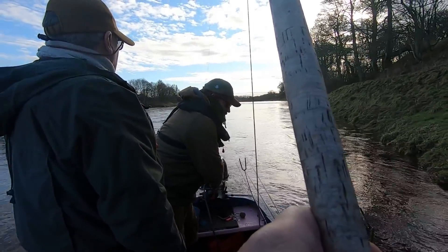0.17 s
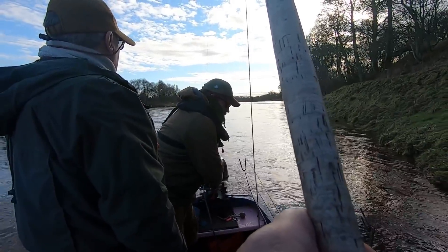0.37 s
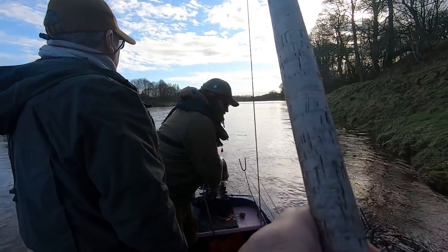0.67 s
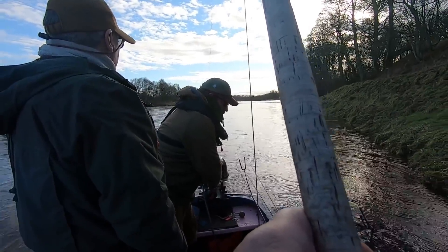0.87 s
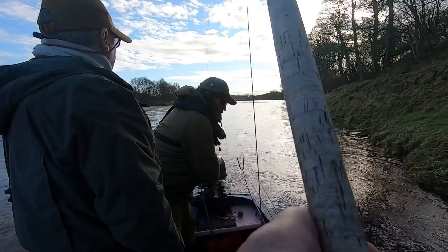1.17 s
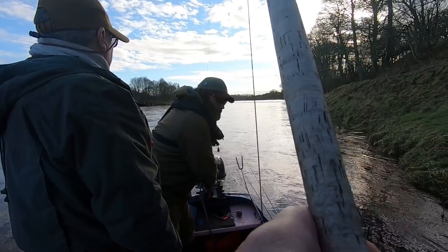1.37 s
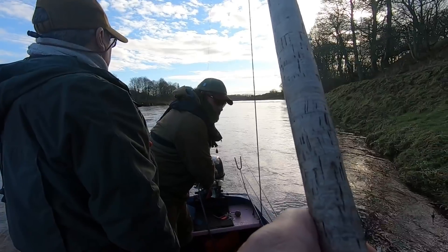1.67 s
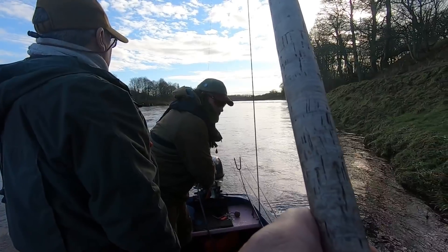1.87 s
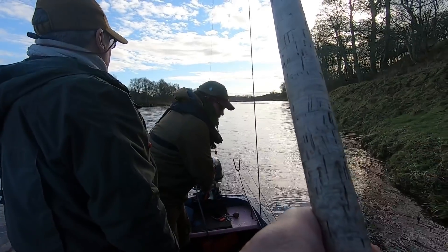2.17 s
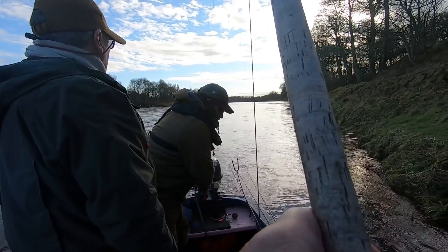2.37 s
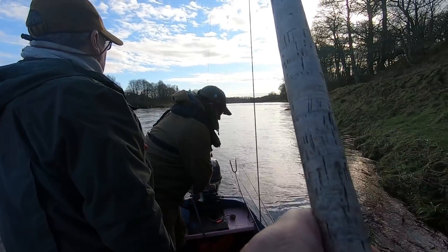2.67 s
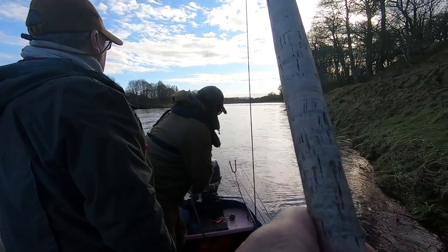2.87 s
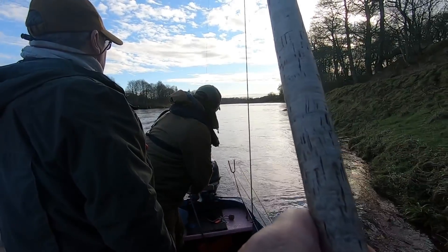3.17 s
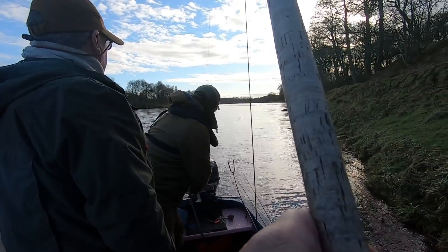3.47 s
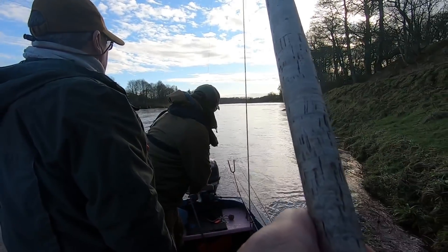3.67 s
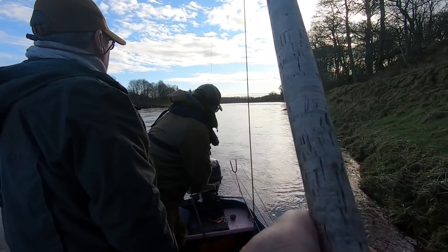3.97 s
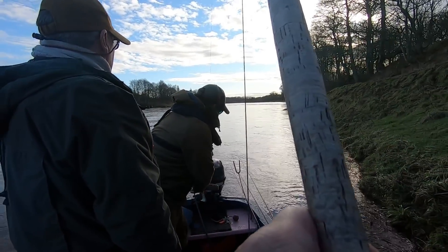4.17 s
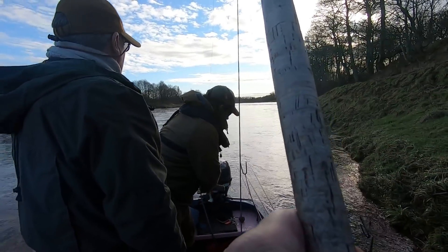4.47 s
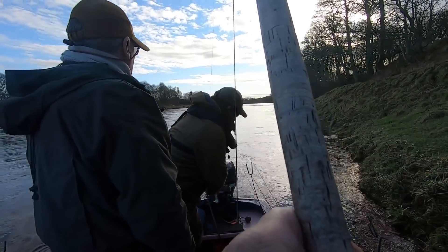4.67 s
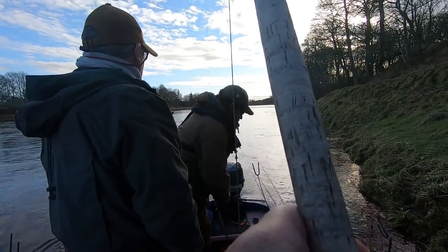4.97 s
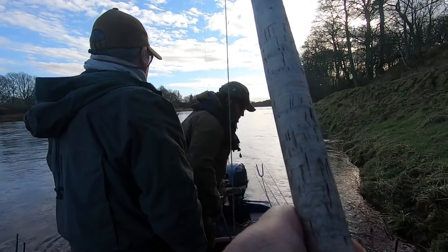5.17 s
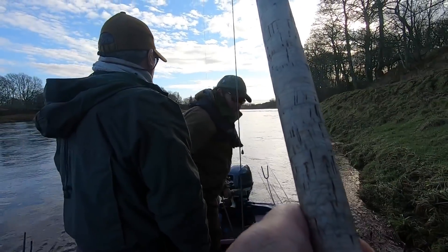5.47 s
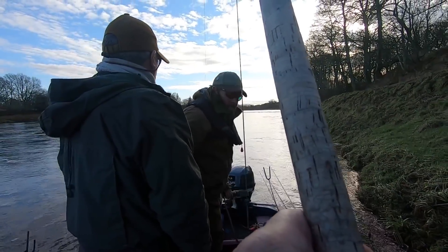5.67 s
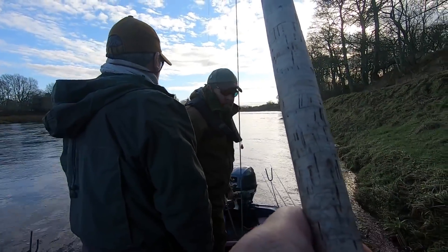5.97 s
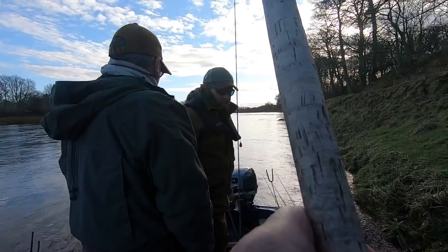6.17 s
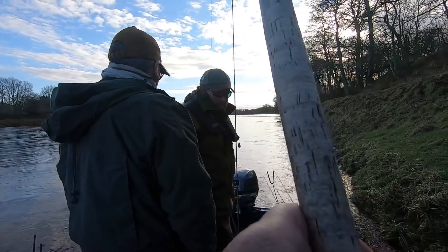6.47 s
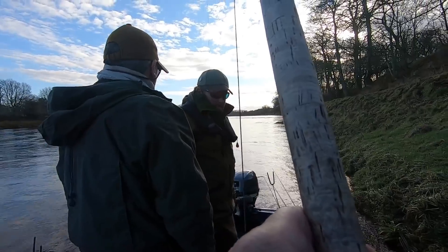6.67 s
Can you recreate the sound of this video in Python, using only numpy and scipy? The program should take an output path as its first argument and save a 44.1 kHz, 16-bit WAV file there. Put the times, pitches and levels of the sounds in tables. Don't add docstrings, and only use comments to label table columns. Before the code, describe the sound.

Rapid, sharp steel reel clicks surge and hesitate as line is pulled, while a low boat motor burbles, knocks out of gear and putters unevenly.

```python
import sys
import numpy as np
from scipy import signal
from scipy.fft import rfft, irfft, next_fast_len
from scipy.io import wavfile
from scipy.ndimage import map_coordinates

SR = 44100
rng = np.random.default_rng(int(sys.argv[2]) if len(sys.argv) > 2 else 0)


def wrap_up_sound(samples):
    columns = np.atleast_2d(samples).T
    tamed = np.clip(columns, -1, 1)
    steps = np.round(tamed * 32767).astype(np.int16)
    wavfile.write(sys.argv[1], SR, steps)


def volts_from_decibels(level):
    exponent = np.asarray(level, float) / 20
    return 10 ** exponent


N = 301203


def unit(x):
    return x / np.sqrt(np.mean(x ** 2) + 1e-20)


def along(points, hz):
    f, v = np.transpose(points)
    return np.interp(np.log(hz + 1), np.log(f + 1), v)


def curves(rows):
    s, *cols = np.transpose(rows)
    return [np.interp(np.arange(N) / SR, s, c) for c in cols]


def wobble(rate):
    knots = rng.standard_normal(int(N * rate / SR) + 4)
    return map_coordinates(knots, [np.arange(N) * rate / SR])


def filtered(x, response):
    m = next_fast_len(N + SR // 2)
    return irfft(rfft(x, m) * response(np.fft.rfftfreq(m, 1 / SR)), m)[..., :N]


def ringing(x, modes):
    def response(f):
        total = 0
        for k, (centre, width, db) in enumerate(modes):
            damping = 1j * f * width
            total = total + (-1) ** k * volts_from_decibels(db) * damping / (centre ** 2 - f ** 2 + damping)
        return total
    return filtered(x, response)


# t/s, speed/(teeth/s)
PACE = [(0, 46.2), (.98, 67.21), (1.95, 38.8), (2.93, 61.15), (3.9, 41.09), (4.88, 25.03), (5.85, 38.04),
        (6.83, 25.06)]
# t/s, gain/(teeth/s), half-width/s
TUGS = [(0.048, 37.6, 0.16), (0.473, 26.7, 0.042), (0.602, 28.3, 0.033), (1.149, 23.5, 0.057),
        (1.402, 37.9, 0.046), (1.519, 29.3, 0.04), (1.923, 26.3, 0.029), (2.092, 22.8, 0.114),
        (2.433, 34.3, 0.069), (2.628, 38.6, 0.067), (2.873, 32.7, 0.057), (3.042, 18.3, 0.088),
        (3.276, 41.7, 0.062), (3.465, 27.3, 0.065), (3.739, 23.7, 0.079), (3.843, 34.3, 0.16),
        (4.161, 56.8, 0.061), (4.312, 43.2, 0.046), (4.416, 34.9, 0.042), (4.658, 75.6, 0.081),
        (4.837, 41.5, 0.043), (5.023, 39.8, 0.107), (5.266, 60.3, 0.046), (5.434, 25.3, 0.064),
        (5.56, 43.8, 0.042), (5.897, 28.2, 0.049), (6.113, 51.0, 0.114), (6.403, 80.9, 0.067),
        (6.63, 52.9, 0.089), (6.852, 59.9, 0.065)]
# t/s, loss/(teeth/s), half-width/s
SNAGS = [(0.758, 11.9, 0.059), (1.204, 16.8, 0.085), (1.704, 13.1, 0.045), (2.619, 25.5, 0.034),
         (3.795, 45.0, 0.038), (4.636, 45.0, 0.039), (5.052, 23.2, 0.054), (5.35, 15.1, 0.041),
         (5.777, 9.6, 0.036), (5.965, 27.8, 0.033), (6.091, 14.8, 0.037), (6.418, 32.7, 0.033)]


def teeth():
    t = np.arange(N) / SR

    def bumps(rows):
        return sum(height * np.exp(-((t - s) / width) ** 2) for s, height, width in rows)

    speed = curves(PACE)[0] + bumps(TUGS) - bumps(SNAGS)
    turned = 0.01 + np.cumsum(speed) / SR
    return np.interp(np.arange(int(turned[-1]) + 1), turned, t) + 0.00054


def once_a_turn(count, mean, swing, peak_tooth):
    teeth_per_turn = 30
    return mean + swing * np.cos(2 * np.pi * (np.arange(count) - peak_tooth) / teeth_per_turn)


def contacts(times, db, t60, grit_db):
    shared = 0.06
    t = np.arange(192) / SR
    push = volts_from_decibels(grit_db - 60 * t / t60) * rng.standard_normal((len(times), 2, len(t)))
    push[:, 0] = np.sqrt(shared) * push[:, 1] + np.sqrt(1 - shared) * push[:, 0]
    push[:, :, 0] = 1
    start = np.round(times * SR).astype(int)[:, None]
    at = (start + np.arange(len(t))).clip(0, N).ravel()
    out = []
    for port in (0, 1):
        weight = volts_from_decibels(db)[:, None] * push[:, port]
        out.append(np.bincount(at, weight.ravel(), N + 1)[:N])
    return np.array(out)


def first_pawl_hits(times, db, chance):
    scrape = contacts(times - 0.0005, db - 21.5, t60=0.0042, grit_db=2)
    drop = contacts(times, db + 0.66 * chance[:, 1], t60=0.0056, grit_db=-17)
    return scrape + drop


def second_pawl_hits(later, db, chance):
    rebound_at = later + 0.0008 + 0.0003 * chance[:, 3]
    settle_at = later + 0.0087 + 0.002 * chance[:, 7]
    drop = contacts(later, db + 1.3 * chance[:, 2], t60=0.0059, grit_db=-11)
    rebound = contacts(rebound_at, db - 13.5, t60=0.002, grit_db=-2.5)
    settle = contacts(settle_at, db - 27.5 + 4 * chance[:, 1], t60=0.0054, grit_db=-27)
    return drop + rebound + settle


# f/Hz, width/Hz, level/dB
SPOOL = [
    [(3940, 660, 0)],
    [(2750, 490, -9.5), (3480, 450, 0)],
    [(4940, 180, -5.5)],
]


def spool(times, later, slow, chance):
    rules = [(-3, 1.5, 16.5), (-3, 3.5, 19), (2, 1.5, 22)]
    out = 0
    for part, (rule, modes) in enumerate(zip(rules, SPOOL)):
        grip = 1.76 * wobble(9)[(times * SR).astype(int)]
        db = once_a_turn(len(times), *rule) + 1 * slow + grip
        knocks = contacts(later, db + 2.5 * chance[:, 4 + part], t60=0.017, grit_db=-12)
        out = out + ringing(knocks, modes)
    return out


# f/Hz, width/Hz, level/dB
TIP = [(11360, 1100, -0.5), (14000, 2500, -2.5)]


def snap(times, later, db_1, db_2, chance):
    first = contacts(times, db_1 - 5 + 2.6 * chance[:, 6], t60=0.006, grit_db=-6)
    second = contacts(later, db_2 + 2.1 * chance[:, 7], t60=0.013, grit_db=-2)
    return ringing(first + second, TIP)


# f/Hz, width/Hz, level/dB
FRAME = [(1138, 188, -1), (1434, 40, -11), (1723, 20, 1.5), (2065, 97, 4.5)]


def cage(hits):
    return ringing(hits * volts_from_decibels(1.2 * wobble(14)), FRAME)


# f/Hz, width/Hz, level/dB
PAWL_1 = [(2136, 418, -11.5), (6550, 650, -9), (6640, 900, -11), (7290, 375, 4), (8510, 355, 2.5),
          (9850, 1900, -10)]
# f/Hz, width/Hz, level/dB
PAWL_2 = [(6624, 1090, -1), (7590, 815, 0.5), (8880, 400, -9.5), (10200, 550, -4)]


def reel():
    times = teeth()
    count = len(times)
    slow = np.log(np.gradient(times) / 0.016)
    chance = rng.standard_normal((count, 8))
    db_1 = once_a_turn(count, 0.73, 1, 5.5)
    db_2 = once_a_turn(count, -0.17, 0.74, 13.5)
    dwell = np.tanh(once_a_turn(count, 0.3, 2.5, 12))
    lag_ms = (1.0 + 0.65 * dwell) * np.exp(0.8 * slow)
    later = times + (lag_ms + 0.12 * chance[:, 0]) / 1000

    first = first_pawl_hits(times, db_1, chance)
    second = second_pawl_hits(later, db_2, chance)
    springs = volts_from_decibels(6) * ringing(first, PAWL_1) + volts_from_decibels(5.5) * ringing(second, PAWL_2)
    body = springs + volts_from_decibels(-7) * spool(times, later, slow, chance)
    body = filtered(body, lambda hz: 1 / (1 + (hz / 11300) ** 12))
    clicks = body + volts_from_decibels(-28) * snap(times, later, db_1, db_2, chance)
    return volts_from_decibels(4.5) * (clicks + volts_from_decibels(-11.5) * cage(first + second))


# f/Hz, level/dB
SHADOW = [(60, -1.0), (110, -5), (200, -4), (380, 8), (700, -43), (1290, -2), (2380, -6), (4400, -6.5),
          (8120, -11), (15000, 1.5)]
# f/Hz, phase/rad
LEAD = [(0, -3), (600, 2.8), (1290, 4), (1720, 1), (1980, 2), (3960, 0), (5000, -3.5), (6030, -9),
        (6550, -8), (8010, -6.5), (8610, -3.5), (10400, -9), (13000, -19.5), (16400, -13.5)]


def round_camera(clicks):
    def response(hz):
        left = volts_from_decibels(along(SHADOW, hz) - 1.8) * np.exp(1j * along(LEAD, hz))
        return [left, 1 + 0 * hz]
    return filtered(clicks, response)


# f/Hz, t60/s
BOAT = [(1500, 0.49), (3000, 0.094), (4800, 0.054), (6500, 0.023), (10500, 0.0048), (12000, 0.0061)]


def boat(x):
    phase = np.array([[0], [np.pi / 2]])
    share = np.cos(np.pi * 3.1 * np.arange(N) / SR + phase)
    hz, t, z = signal.stft(rng.standard_normal((2, 2, 4096)), SR, nperseg=128)
    decay = volts_from_decibels(-60 * t / along(BOAT, hz)[:, None])
    tails = signal.istft(z * decay, SR, nperseg=128)[1]
    tails = tails / np.linalg.norm(tails[0, 0])
    delayed = np.pad(x * share, ((0, 0), (150, 0)))
    wet = signal.fftconvolve(delayed[:, None], tails, axes=2)
    return wet.sum(0)[:, :N] * volts_from_decibels([[-4], [0]])


# f/Hz, level/(dB per Hz)
RIVER = [(15, 2), (30, -10), (50, 2), (95, -0.5), (200, 1.5), (320, -10), (500, -15.5), (800, -18),
         (1500, -12.5), (2800, -27), (4700, -56), (7500, -15.5), (10800, -35.5), (11600, -72)]
# f/Hz, likeness/(0-1)
ALIKE = [(30, 0.94), (60, 0.91), (200, 1), (350, 0.79), (640, 0.49), (1400, 0.04)]


def river():
    def response(hz):
        angle = np.arccos(np.clip(along(ALIKE, hz), -1, 1)) / 2
        return volts_from_decibels(along(RIVER, hz)) * [np.cos(angle), np.sin(angle)]
    mid, side = filtered(rng.standard_normal((2, N)), response)
    db = -47 + 0.33 * wobble(3.21) + 1.74 * wobble(14)
    return volts_from_decibels(db) * unit(np.array([mid + side, mid - side]))


# t/s, rate/(firings/s)
IDLE = [(0, 24.2), (1.5, 24), (1.9, 25.2), (2.4, 25), (2.9, 24.1), (3.3, 23.8), (3.5, 22.8), (4.3, 21.8),
        (4.4, 19.6), (5.5, 19.4), (5.9, 19), (6.83, 18.8)]


def engine_turns():
    rate = curves(IDLE)[0] * (1 + 0.0064 * wobble(6.06))
    return np.cumsum(rate) / SR + 0.2825


# order/(times firing rate), level in gear/dB, level in neutral/dB
DRONE = [(1, -12, -22), (2, -6, -14), (2.5, -40, -6), (3, 0, -14), (4, -18, -3), (5, -7, -7), (6, -9, -14),
         (7, -6, -9)]


def drone(turns, neutral):
    out = 0
    for order, gear_db, neutral_db in DRONE:
        db = gear_db + (neutral_db - gear_db) * neutral + 1.8 * wobble(5)
        out = out + volts_from_decibels(db) * np.sin(2 * np.pi * order * turns + order ** 2)
    return unit(out)


# f/Hz, width/Hz, level/dB
EXHAUST = [
    [(128, 42, -2.5), (163.5, 61, 0.5), (209.5, 26, 2.5)],
    [(136, 41.5, 2.5), (201, 7.3, -20)],
]


def exhaust(turns, neutral, puff_db):
    fired = np.diff(np.floor(turns), prepend=0) * volts_from_decibels(0.93 * wobble(12))
    churn = rng.standard_normal(N)
    loaded = unit(ringing(fired * (1 - neutral) + 0.016 * churn, EXHAUST[0]))
    loaded = loaded * volts_from_decibels(puff_db - 2 - 7.8 * neutral)
    s, db = neutral_firings()
    free = np.bincount((s * SR).astype(int), volts_from_decibels(db + 49), N)[:N]
    pipe = ringing(free, EXHAUST[1])
    free = ringing(pipe, EXHAUST[1])
    return filtered(loaded + free, lambda f: 1 / (1 + (f / 280) ** 6) / (1 + (105 / (f + 1)) ** 8))


# t/s, drone level/dB, puff level/dB
MOTOR = [(0, -51, -41.5), (1.6, -52, -46), (3.2, -50.5, -43.5), (3.8, -50.5, -57), (4.2, -43, -48.5),
         (4.4, -62, -45), (4.9, -64, -58), (5.5, -57, -35), (5.8, -47.5, -35), (6.83, -51, -39)]


def outboard():
    drone_db, puff_db = curves(MOTOR)
    neutral = np.interp(np.arange(N) / SR, [4.3, 4.4], [0, 1])
    turns = engine_turns()
    return volts_from_decibels(drone_db - 0.5) * drone(turns, neutral) + exhaust(turns, neutral, puff_db)


# t/s, peak level/dB, start f/Hz,
# length/s, pitch rise/(0-1)
GLUGS = [(0.061, -35, 201, 0.13, 0.13), (.2, -39.5, 212, 0.15, 0.09), (.3, -38.5, 154, 0.27, 0.06),
         (.51, -37.5, 170.7, 0.15, 0), (0.794, -40.5, 213, 0.14, 0), (1.0, -40, 163.2, 0.2, 0),
         (1.17, -40.5, 193, 0.21, 0.22), (1.18, -36, 170.8, 0.18, 0.09), (1.33, -39, 138.3, 0.24, 0.09),
         (1.82, -36, 175.4, 0.14, 0.33), (2.0, -35, 165.5, 0.13, 0.11), (2.16, -35, 177, 0.14, 0.1),
         (2.31, -32.5, 171.3, 0.077, 0.02), (2.52, -38, 170.5, 0.1, 0), (2.64, -34, 182.8, 0.15, 0.1),
         (2.979, -32.5, 195, 0.074, 0.2), (3.4, -43, 170.2, 0.21, 0), (3.5, -38, 173, 0.13, 0.26),
         (3.72, -42.5, 201, 0.15, 0), (4.0, -39, 178, 0.085, 0), (4.15, -41, 202, 0.064, 0),
         (4.161, -40, 62.2, 0.14, 0.23), (5.27, -42.5, 199, 0.18, 0.13)]


def glugs():
    out = np.zeros(N + SR)
    for s, db, hz, length, rise in GLUGS:
        u = np.arange(round(length * SR)) / (length * SR)
        swell = np.sin(np.pi * u ** 0.81) ** 0.53
        cycles = hz * length * (u + rise * u * u / 2)
        out[round(s * SR):][:len(u)] += volts_from_decibels(db) * swell * np.sin(2 * np.pi * cycles)
    return out[:N] * volts_from_decibels(0.7 * wobble(24.76))


# t/s, peak level/dB, f/Hz, t60/s
KNOCKS = [
    (3.826, -56, 600, 0.06),
    (3.946, -45, 636, 0.089),
    (4.167, -38, 535, 0.045),
    (4.431, -47, 530, 0.094),
]


def lever():
    out = np.zeros(N + SR)
    t = np.arange(SR // 4) / SR
    for s, db, hz, t60 in KNOCKS:
        tone = np.sin(2 * np.pi * hz * t)
        tone += 0.4 * np.sin(2.55 * np.pi * hz * t) + 0.39 * np.sin(1.1 * np.pi * hz * t)
        onset = 1 - np.exp(-t / 0.0017)
        out[round(s * SR):][:len(t)] += volts_from_decibels(db - 60 * t / t60) * onset * tone
    return out[:N]


# t/s, peak level/dB
WARM_UP = [(4.4, -40), (5.2, -47), (5.5, -36.5), (6.2, -34), (6.8, -32)]
# t/s, loss/dB
MISFIRES = [(4.49, 3), (4.54, 25), (4.70, 5), (4.76, 25), (4.92, 3), (4.98, 25), (5.04, 8), (5.2, 25),
            (5.25, 10), (5.41, 20), (5.63, 25), (5.85, 8), (6.05, 11), (6.33, 6), (6.69, 11)]


def neutral_firings():
    count, gap_s = 45, 0.0546
    k = np.arange(count)
    chance = rng.standard_normal((count, 2))
    s = 4.436 + gap_s * k - 0.00002 * k ** 2
    db = np.interp(s, *np.transpose(WARM_UP)) + 1.2 * chance[:, 0]
    for at, loss_db in MISFIRES:
        db = db - loss_db * (np.abs(s - at) < gap_s / 2)
    return s + 0.00272 * chance[:, 1], db


def scene():
    clicks = reel()
    near = round_camera(clicks) + volts_from_decibels(-15.5) * boat(clicks[1])
    water = river() * volts_from_decibels([[-1.2], [1.2]])
    stern = (outboard() + glugs() + lever()) * volts_from_decibels([[-0.4], [0.4]])
    return near + water + stern


def top_cut(x):
    return signal.sosfilt(signal.butter(12, 16800, fs=SR, output="sos"), x)


def record(dry):
    soft = dry / (1 + np.abs(dry / 0.56) ** 4) ** (1 / 4)
    mix = filtered(soft, lambda hz: 1 / (1 + (hz / 14700) ** 22))
    return top_cut(mix)


dry = scene()
out = record(dry)
wrap_up_sound(out)
```